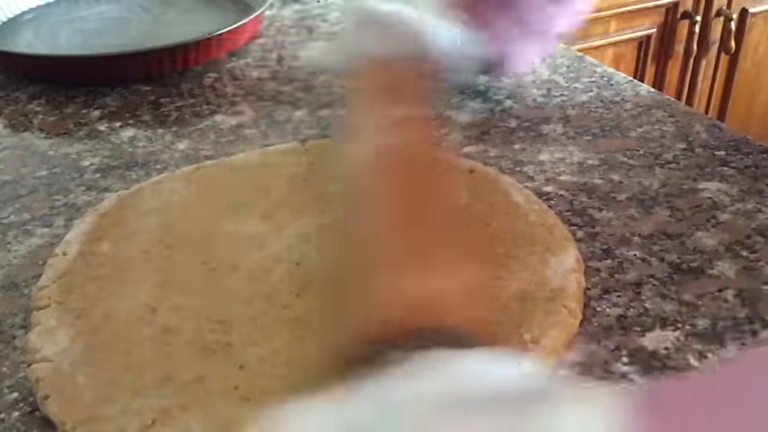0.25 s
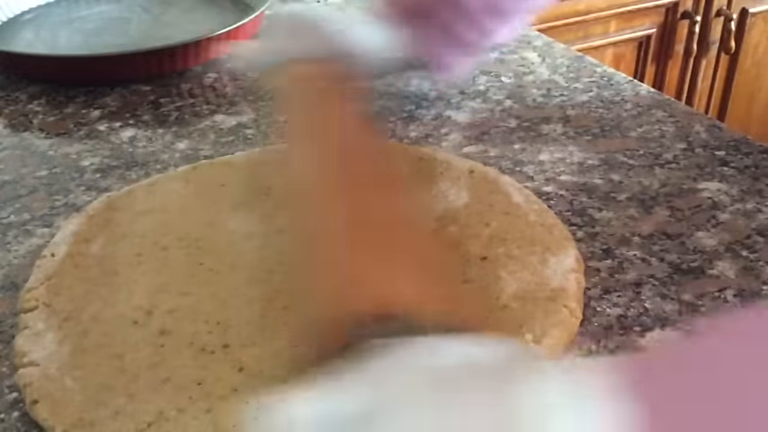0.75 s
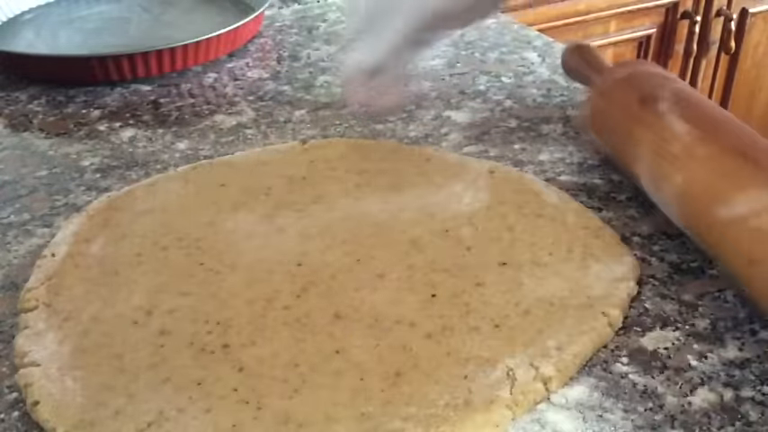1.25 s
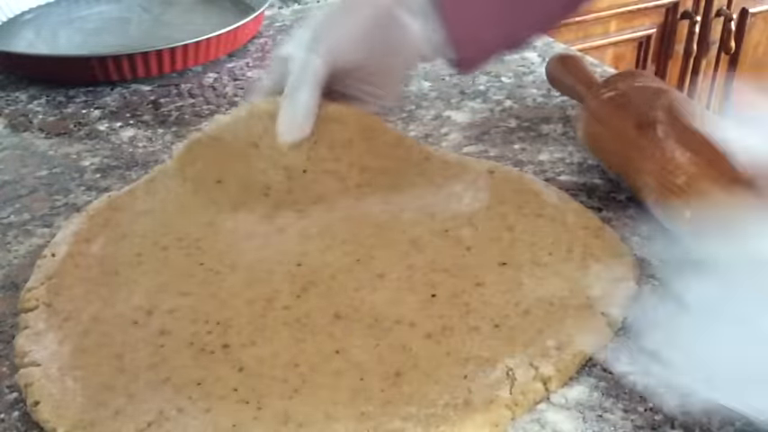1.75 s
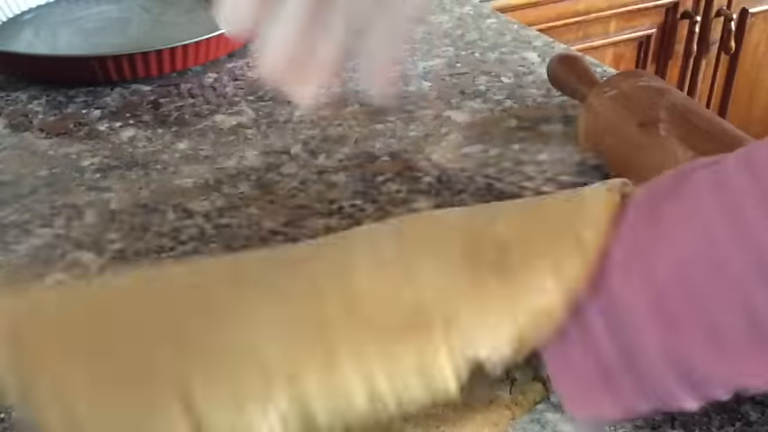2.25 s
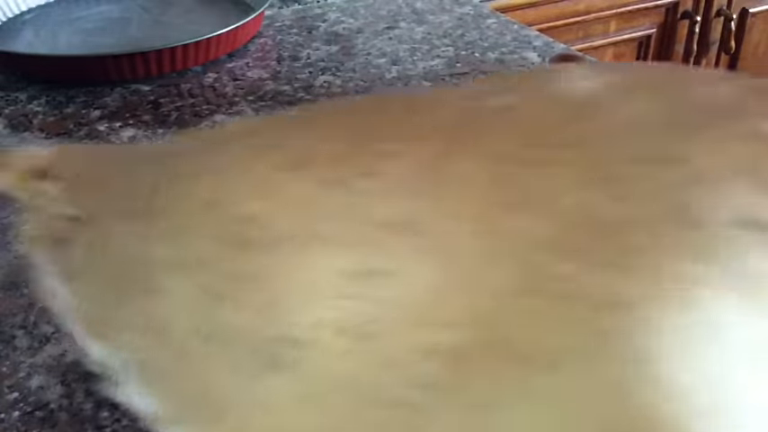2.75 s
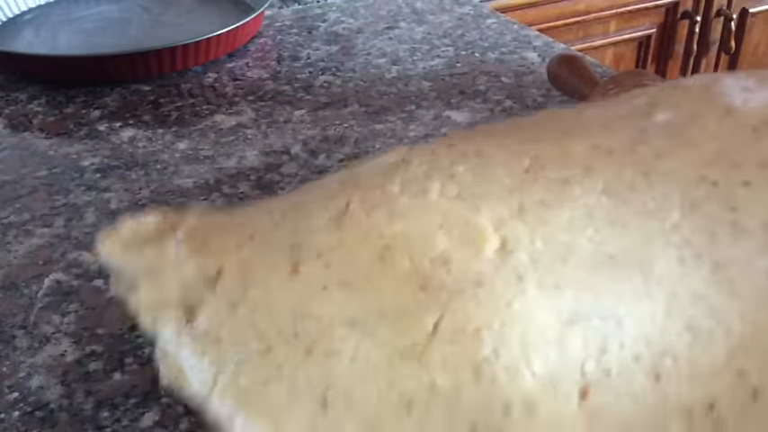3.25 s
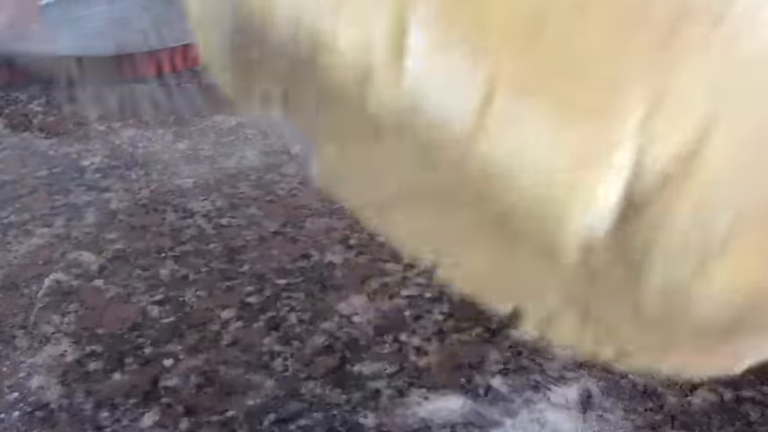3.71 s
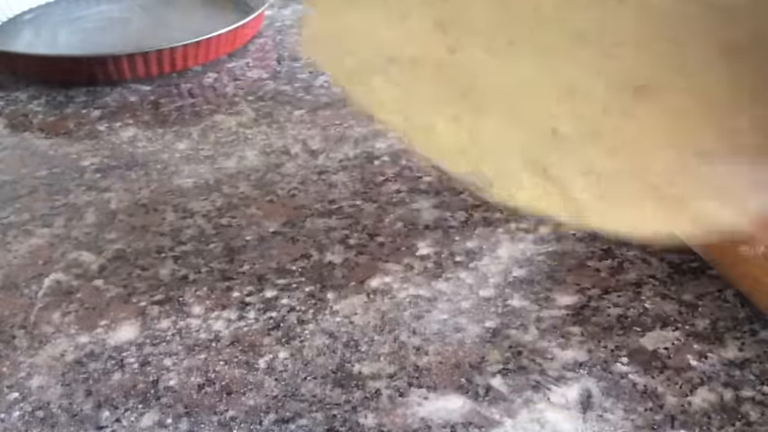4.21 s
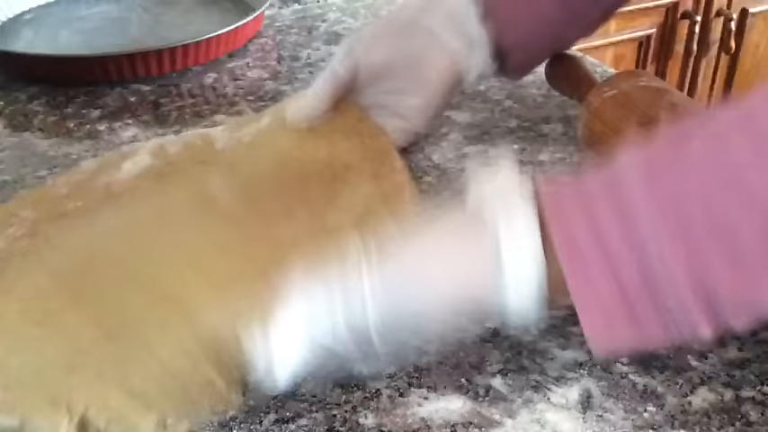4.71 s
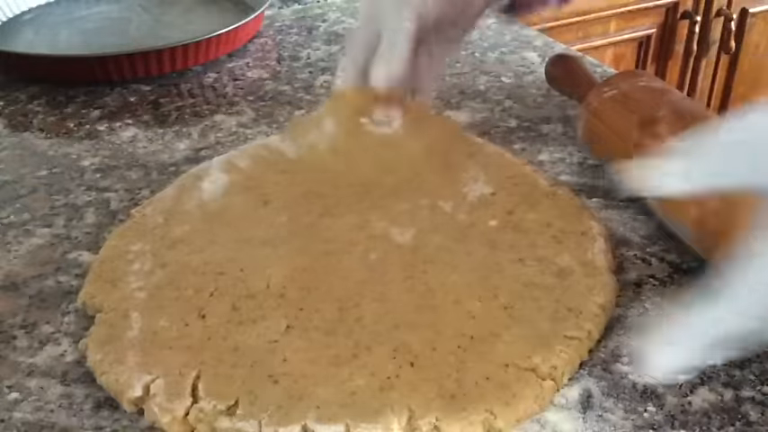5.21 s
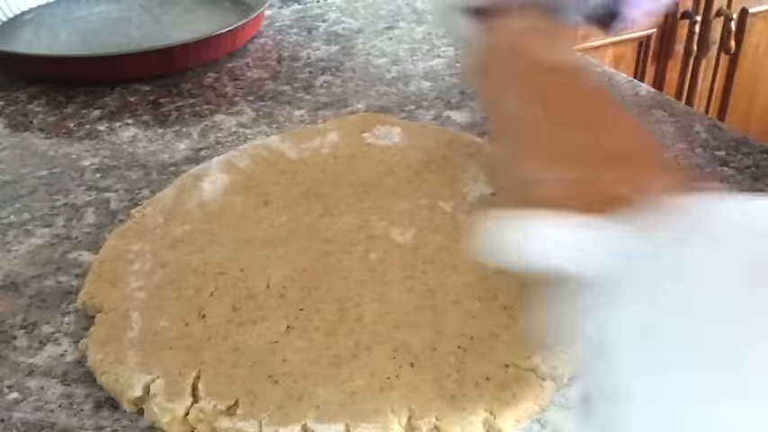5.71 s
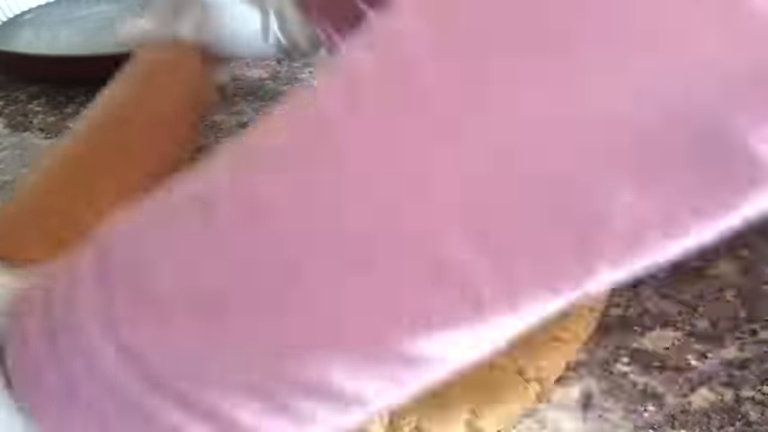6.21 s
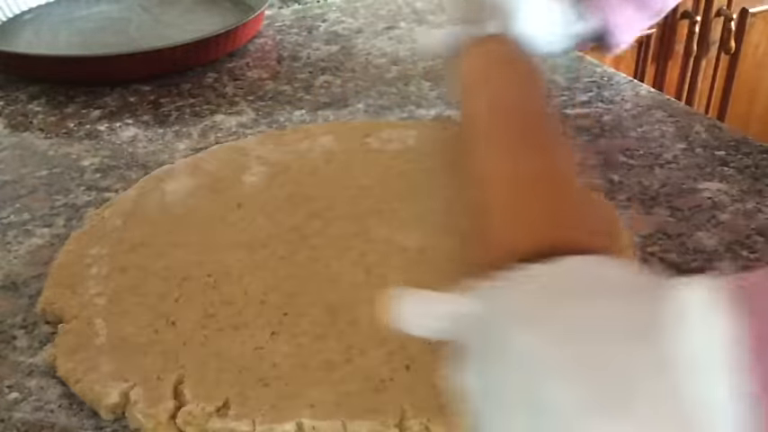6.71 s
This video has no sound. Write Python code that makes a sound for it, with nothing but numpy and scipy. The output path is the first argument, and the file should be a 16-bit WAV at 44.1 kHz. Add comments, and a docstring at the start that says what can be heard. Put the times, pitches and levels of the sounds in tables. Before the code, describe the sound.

Close up in a slightly echoing kitchen, a wooden pin rubs quietly across floured dough and lands on stone with a loud double clack. After some light handling, cloth scrapes and bumps past the microphone in a rush. A short lull follows, then dough slaps onto the counter and hands brush over it. The pin is picked up with a duller clack and rolls again, its loose handle knocking, over a low fridge hum.

```python
"""A wooden rolling pin rolls dough on a floured stone countertop: the flour hisses, the barrel rubs and
sings on its axle. The pin is set down with a clack, ringing wood and slab, and later picked up again.
The dough is lifted and turned while a sleeve brushes past the microphone, then flops back with a soft push
of air and is smoothed by gloved hands. The cabinet below booms, the kitchen answers and a fridge hums."""
import sys
import numpy as np
from scipy import signal
from scipy.fft import rfft, irfft, next_fast_len
from scipy.io import wavfile
from scipy.ndimage import uniform_filter1d, map_coordinates

SR = 44100
rng = np.random.default_rng(int(sys.argv[2]) if len(sys.argv) > 2 else 0)


def to_wav(sig):
    """Store sig (one row per channel, or 1-D mono) as 16-bit WAV at the path in sys.argv[1].

    Samples outside -1..1 are clipped; the rate is SR.
    """
    pcm = np.clip(np.atleast_2d(sig), -1, 1) * 32767
    pcm = np.round(pcm).astype(np.int16)
    wavfile.write(sys.argv[1], SR, pcm.T)  # frames by channels


N = 306936

# the pin strikes the stone: t/s, wood level/dB, contact brightness/Hz, slab level/dB
PIN_STRIKES = [(1.1554, -8, 2420, -4.5), (1.1613, -7.5, 2500, -18.5), (1.169, -26, 2500, -20.5),
               (5.9028, -17, 4000, -27.5), (5.908, -9, 5350, -35), (5.913, -30, 3530, -27)]


def rolling_and_sliding():
    """The pin rubs and sings on its axle as it rolls; gloves and dough slide over flour."""
    # passes of the pin across the dough: t/s, length/s, flour hiss/dB, axle song/dB
    passes = [(0.0, .21, -64, -68), (0.29, 0.21, -63, -73.5), (0.618, .25, -63.5, -74),
              (6.083, .17, -65.5, -75), (6.66, 0.21, -68.5, -79.5)]
    # gloves and dough slide over flour: t/s, length/s, level/dB
    slides = [(0.86, 0.23, -63.5), (1.19, 0.047, -50), (1.372, 0.16, -56.5), (1.56, 0.066, -52),
              (1.603, 0.057, -40.5), (1.69, 0.19, -57), (1.945, 0.042, -55), (2.075, 0.124, -55.5),
              (2.21, .09, -59), (2.28, .06, -56), (2.44, .23, -66.5), (4.525, .064, -42), (4.6, .1, -51.5),
              (4.682, .083, -36.5), (4.77, .135, -59), (4.97, 0.21, -57), (5.11, .09, -52),
              (5.193, .058, -38), (5.39, 0.22, -57), (5.472, .067, -41.5), (5.725, .085, -55.5),
              (5.96, 0.1, -50.5), (6.52, 0.11, -41.5), (6.61, 0.034, -40.5)]
    # the barrel scuffs against glove and stone: t/s, length/s, level/dB
    scuffs = [(1.13, 0.03, -54), (1.19, 0.074, -46), (2.31, .03, -57), (4.55, 0.037, -56),
              (5.21, .055, -56), (6.53, 0.046, -50), (6.625, 0.018, -40)]
    # hiss of flour: f/Hz, density/dB
    flour_tone = [(200, -8), (700, -9), (1800, -7), (3000, -3), (4700, -2), (6500, -5.5), (10000, -1),
                  (15500, -5)]
    # rubbed wood: f/Hz, density/dB
    wood_tone = [(400, -19), (850, -13), (1250, 3.5), (1900, -6.5), (2650, -8), (2920, -6), (3250, -8),
                 (7000, -19.5)]
    # the barrel's main mode, excited by the axle: f/Hz, density/dB
    squeak_tone = [(2400, -45.5), (2800, -16), (2930, -3.5), (3080, -13), (3600, -51.5)]
    rolling = moves([(s, length, db) for s, length, db, _ in passes], attack_s=0.11, fall_db_per_s=111.5)
    singing = moves([(s, length, db) for s, length, _, db in passes], attack_s=0.12, fall_db_per_s=150)
    sliding = moves(slides, attack_s=0.034, fall_db_per_s=264.5) * amp(1.3 * wobble(40))
    scuffing = moves(scuffs, attack_s=0.015, fall_db_per_s=452.5)
    fidget = amp(-78 + 3 * wobble(18))  # the gloves never quite keep still
    flour = friction(flour_tone, slips_per_s=16000, flutter_db=0.9, patchy_db=1.2)
    wood = friction(wood_tone, slips_per_s=3500, flutter_db=1.5, patchy_db=1.5)
    hiss = np.sqrt(sliding ** 2 + rolling ** 2 + fidget ** 2) * flour
    rub = np.hypot(scuffing, amp(-3.5) * rolling) * wood
    squeak = singing * amp(1.5 * wobble(11)) * coloured(rng.standard_normal(N), squeak_tone)
    return hiss + rub + squeak


def pin_clacks():
    """Wood meets stone: a crack, the pin's bright ring and the slab's dull knock."""
    # modes of the wooden pin: f/Hz, level/dB, t60/s
    pin_modes = [(1150, -12, 0.04), (1360, -11, 0.029), (1430, -8.5, 0.024), (1660, -10, 0.009),
                 (1928, -11, .018), (1983, -9.5, 0.012), (2660, -12, 0.018), (2792, -8.5, 0.048),
                 (2928, 1, 0.039), (3120, -13, 0.0043), (4400, -18.5, 0.0087), (5400, -25, 0.0066)]
    # modes of the stone slab: f/Hz, level/dB, t60/s
    slab_modes = [(176, -10, .06), (230, -2, 0.018), (394, -2.5, 0.028), (475, -7, 0.044),
                  (694, -5.5, 0.015), (743, -7.5, 0.031), (1060, 3, 0.012)]
    out = np.zeros(N)
    for s, wood_db, contact_hz, slab_db in PIN_STRIKES:
        crack = amp(-7.5) * burst(t60=0.031)
        grit = amp(-36.5) * crack  # flour grit keeps a trace of treble
        wood = lowpass(ring(pin_modes) + crack, contact_hz, order=4) + grit  # longer contact is duller
        wood = highpass(wood, hz=750)  # the slim pin radiates no bass
        slab = highpass(lowpass(ring(slab_modes), hz=1790, order=2), hz=96.2)
        add(out, s, amp(wood_db) * wood + amp(slab_db) * slab)
    return out


def axle_chatter():
    """After each strike the barrel buzzes briefly on its axle."""
    # buzz of the loose axle: f/Hz, gain/dB
    buzz_tone = [(300, -23.5), (750, -13), (1200, -0.5), (1800, 3), (2400, -2), (2930, 7), (3300, -3),
                 (3900, -22), (9000, -31)]
    out = np.zeros(N)
    for s, wood_db, _, _ in PIN_STRIKES:
        add(out, s, amp(wood_db) * burst(t60=0.085))
    buzz = out * amp(1.8 * wobble(160))
    return amp(-12) * filtered(buzz, lambda hz: amp(along(buzz_tone, hz)))


def handle_knocks():
    """The loose handle takes up its play with a small hollow knock."""
    # the handle hits its axle: t/s, level/dB
    knocks = [(5.196, -49), (5.2177, -43.5), (5.298, -43.5), (5.752, -43), (6.2787, -51), (6.393, -39),
              (6.8496, -27.5)]
    # modes of the handle: f/Hz, level/dB, t60/s
    handle_modes = [(382, -1.5, 0.033), (505, -6, 0.032), (660, -4.5, .025), (960, -2.5, 0.03),
                    (1130, 0.5, 0.024), (1274, 2.5, 0.0089), (2940, -24.5, 0.027)]
    out = np.zeros(N)
    for s, db in knocks:
        add(out, s, amp(db) * (ring(handle_modes) + amp(-44) * burst(t60=0.018)))
    return out


def dough_thuds():
    """Dough, hands and the pin on the dough land softly, pushing out air with a wet smack."""
    # soft landings: t/s, level/dB, pitch/Hz, swell/cycles, relative smack/dB
    landings = [(1.120, -40, 177, 3.4, -12.5), (1.157, -25.5, 141.3, 1, -35.5),
                (1.569, -36, 217, 0.57, -12.5), (1.586, -36.5, 165, 0.99, -19.5),
                (4.7265, -18, 340, 0.29, -10.5), (4.7278, -31, 1210, 0.96, -16),
                (4.742, -23, 130, 0.39, -28), (4.7435, -22, 507, 1.03, -19), (4.778, -27, 300, 0.22, -14.5),
                (4.7935, -17.5, 520, 0.98, -23.5), (4.822, -27, 425, 0.64, -28),
                (4.914, -43.5, 167, 0.44, 10.5), (5.001, -39, 105, .56, -19.5),
                (5.526, -20.5, 291, 0.16, -12.5), (5.536, -29.5, 115, .4, -9.5),
                (5.890, -24, 96, 0.7, -21.5), (5.8925, -30.5, 291, 0.58, -18.5),
                (6.390, -22.5, 87, 0.58, -36.5), (6.393, -30, 167.7, 0.94, -13)]
    return soft_hits(landings, slap_db=-16.5, noise_hz=5995, noise_t60=0.057)


def sleeve():
    """Cloth brushes past the microphone: the weave hisses, seams and folds scrape and bump."""
    # the sleeve gathers speed: t/s, length/s, level/dB
    sweeps = [(2.762, 0.2, -29), (3.212, 0.26, -25)]
    # seams and folds catch and drag: t/s, length/s, level/dB
    drags = [(2.68, .33, -43), (2.84, .03, -36), (3.02, .125, -50.5), (3.342, 0.13, -30)]
    # folds bump the microphone: t/s, level/dB, pitch/Hz, swell/cycles, relative scratch/dB
    bumps = [(2.6865, -31.5, 149.5, 0.63, -0.5), (2.707, -33.5, 163, 1.25, -22),
             (2.823, -34.5, 310, 0.89, -1), (2.857, -30.5, 344, 1.6, -3.5),
             (2.968, -36.5, 128, 0.44, -11.5), (3.025, -33, 338, 1.2, 14.5),
             (3.1988, -11.5, 421, 0.84, -19), (3.1998, -24, 2620, 3.5, -23),
             (3.2025, -22.5, 630, 0.53, -19), (3.496, -29, 120, 0.34, -1)]
    # bright hiss of the weave: f/Hz, density/dB
    weave_tone = [(600, -17.5), (2000, -8.5), (3700, 0), (6000, -4.5), (9500, -1.5), (13000, -2.5),
                  (15500, -6.5)]
    # dark scrape of the folds: f/Hz, density/dB
    fold_tone = [(30, -29), (90, -10.5), (230, -2), (400, -3.5), (750, -10.5), (1600, -10), (3500, -14),
                 (6000, -17), (15000, -40)]
    sweep = moves(sweeps, attack_s=0.17, fall_db_per_s=471)
    drag = moves(drags, attack_s=0.009, fall_db_per_s=273)
    weave = friction(weave_tone, slips_per_s=14000, flutter_db=0.6, patchy_db=1.1)
    folds = friction(fold_tone, slips_per_s=2200, flutter_db=2.05, patchy_db=2.0)
    hiss = np.hypot(sweep, amp(-5) * drag) * weave  # a drag hisses a little too
    scrape = np.hypot(drag, amp(-14) * sweep) * folds  # and a sweep scrapes a little
    return hiss + scrape + soft_hits(bumps, slap_db=-2, noise_hz=4200, noise_t60=0.032)


def cabinet(x):
    """The hollow cabinet under the slab booms at a few low resonances."""
    # cabinet resonances: f/Hz, peak gain/dB, t60/s
    booms = [(57.1, 4, 0.49), (82.1, 5, 0.32), (139.4, 4.5, 0.29), (176.9, 4.5, 0.53)]

    def resonance(f, hz, db, t60):
        width_hz = np.log(1000) / (np.pi * t60)
        return amp(db) * 1j * f * width_hz / (hz * hz - f * f + 1j * f * width_hz)
    return filtered(x, lambda f: sum(resonance(f, *boom) for boom in booms))


def kitchen(x, build_s=0.0053):
    """The room's reverb builds up, then each frequency dies at its own speed."""
    # reverb by band: f/Hz, t60/s, level/dB
    bands = [(60.6, .5, -11), (191.4, 0.65, -1.5), (410, 0.55, -9), (811, 0.62, -8.5), (1200, 0.62, -9.5),
             (1885, 0.6, -9), (2926, .49, -9), (6050, .35, -8.5), (14000, 0.33, -13.5)]
    hz, t, noise = signal.stft(rng.standard_normal(SR), SR, nperseg=256)
    t60 = along([(f, life) for f, life, _ in bands], hz)[:, None]
    echo_db = along([(f, db) for f, _, db in bands], hz)[:, None]
    fade = amp(echo_db - 60 * t / t60) * (1 - np.exp(-t / build_s))
    equal_energy = np.sqrt(2 * np.log(1000) / (t60 * SR))
    tail = signal.istft(noise * fade * equal_energy, SR, nperseg=256)[1]
    return signal.fftconvolve(x, tail)[:N]


def fridge_and_air():
    """The slightly unsteady hum of a fridge over a bed of still air."""
    # partials of the hum: f/Hz, level/dB
    partials = [(48.4, -66.5), (96.9, -67), (172.3, -69.5), (489.9, -63.5), (689.1, -76)]
    # room tone: f/Hz, density/dB
    air_tone = [(25, -21.5), (45, -7.5), (80, -8), (120, -6.5), (160, 0.5), (220, -9.5), (320, -7.5),
                (520, -16), (760, -23.5), (1050, -21), (1700, -32.5), (4000, -33), (15500, -35.5)]
    t = np.arange(N) / SR
    hum = sum(amp(db + wobble(2.6)) * np.sin(2 * np.pi * hz * t + 0.22 * wobble(1.2))
              for hz, db in partials)
    return hum + amp(-58.5) * coloured(rng.standard_normal(N), air_tone)


def friction(spectrum, slips_per_s, flutter_db, patchy_db):
    """Countless tiny slips of random size; pressure flutters and the contact patch changes colour."""
    slips = rng.standard_normal(N) * (rng.random(N) < slips_per_s / SR)
    frames = signal.stft(slips, nperseg=512)[2]
    patches = uniform_filter1d(rng.standard_normal(frames.shape), size=7, axis=0)
    patches = unit(uniform_filter1d(patches, size=7, axis=1))
    patchy = signal.istft(frames * amp(patchy_db * patches), nperseg=512)[1][:N]
    return unit(coloured(patchy, spectrum) * amp(flutter_db * wobble(70)))


def moves(table, attack_s, fall_db_per_s):
    """Gain envelope: each move gathers speed and, once its length is over, dies away."""
    t = np.arange(N) / SR
    power = np.zeros(N)
    for start, length, db in table:
        speed = np.clip((t - start) / attack_s, 0, 1)
        fall_db = fall_db_per_s * np.clip(t - start - length, 0, 1)
        power += (speed ** 2 * amp(db - fall_db)) ** 2
    return np.sqrt(power)


def soft_hits(table, slap_db, noise_hz, noise_t60):
    """Limp things do not ring: each landing is a quick slap, one push of air and a puff of noise."""
    out = np.zeros(N)
    for s, db, hz, cycles, noise_db in table:
        puff = lowpass(burst(noise_t60), noise_hz, order=1)
        slap = amp(slap_db) * push(3.1 * hz, cycles=0.8)  # first contact is quicker than the push
        add(out, s, amp(db) * (slap + push(hz, cycles) + amp(noise_db) * puff))
    return out


def push(hz, cycles):
    """A heavily damped swing of air that swells for the given cycles and dies."""
    phase = hz * np.arange(SR // 2) / SR
    swell = phase / cycles
    return -(swell * np.exp(1 - swell)) ** 2 * np.sin(2 * np.pi * phase)


def ring(modes):
    """Half a second of struck modes; neighbours start in opposite directions."""
    t = np.arange(SR // 2) / SR
    return sum((-1) ** k * amp(db - 60 * t / t60) * np.sin(2 * np.pi * hz * t)
               for k, (hz, db, t60) in enumerate(modes))


def burst(t60):
    """Half a second of noise that dies away."""
    t = np.arange(SR // 2) / SR
    return rng.standard_normal(len(t)) * amp(-60 * t / t60)


def wobble(rate):
    """A smooth random curve, rate knots a second."""
    return map_coordinates(rng.standard_normal(int(N * rate / SR) + 4), [np.arange(N) * rate / SR])


def coloured(x, spectrum):
    """x shaped by the given spectrum, at rms 1."""
    return unit(filtered(x, lambda hz: amp(along(spectrum, hz))))


def filtered(x, response):
    """x through a frequency response."""
    size = next_fast_len(N + SR)
    return irfft(rfft(x, size) * response(np.fft.rfftfreq(size, 1 / SR)), size)[:N]


def lowpass(x, hz, order):
    """Roll off the treble above hz."""
    return signal.sosfilt(signal.butter(order, min(hz, SR / 2 - 1), fs=SR, output="sos"), x)


def highpass(x, hz):
    """Roll off the bass below hz."""
    return signal.sosfilt(signal.butter(2, hz, "high", fs=SR, output="sos"), x)


def along(points, hz):
    """Interpolate (f/Hz, value) points on a log frequency axis."""
    f, values = np.transpose(points)
    return np.interp(np.log(hz + 1), np.log(f + 1), values)


def amp(db):
    """Decibels to gain."""
    return 10 ** (np.asarray(db) / 20)


def unit(x):
    """x at rms 1."""
    return x / np.sqrt(np.mean(x ** 2) + 1e-20)


def add(track, s, sound):
    """Mix a sound into the track at time s."""
    part = track[round(s * SR):][:len(sound)]
    part += sound[:len(part)]


def scene():
    """Knocks and thuds shake the cabinet; the close sleeve sends the least to the reverb."""
    wood = pin_clacks() + axle_chatter() + handle_knocks()
    dough, cloth, rubbing = dough_thuds(), sleeve(), rolling_and_sliding()
    echo = kitchen(wood + amp(-1) * dough + amp(-5) * cloth + amp(-3) * rubbing)
    return (wood + dough + cloth + rubbing + cabinet(wood + dough) + echo + fridge_and_air())[None]


def record(dry):
    """The microphone loses the deepest bass, and the very top is cut off."""
    return filtered(highpass(dry[0], hz=30.19), lambda hz: hz < 15600)[None]


dry = scene()
out = record(dry)
to_wav(out)
```